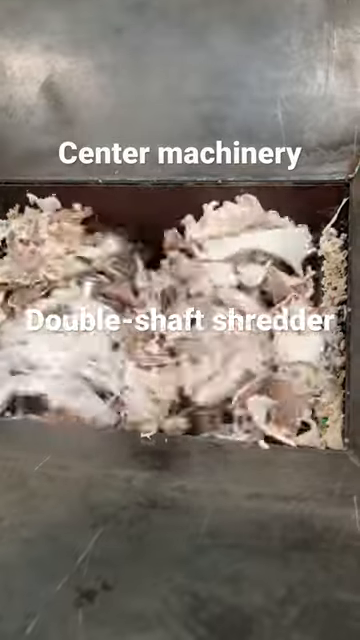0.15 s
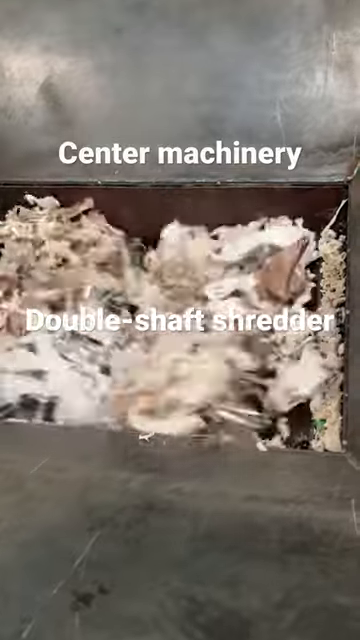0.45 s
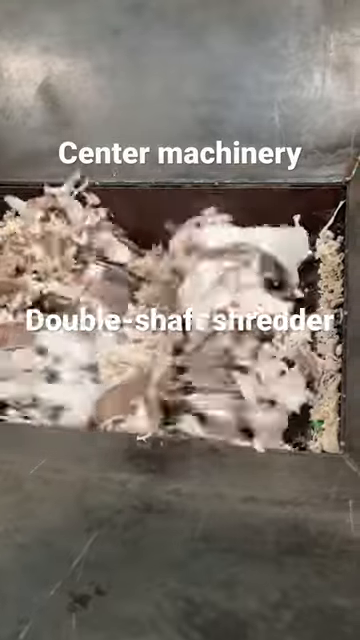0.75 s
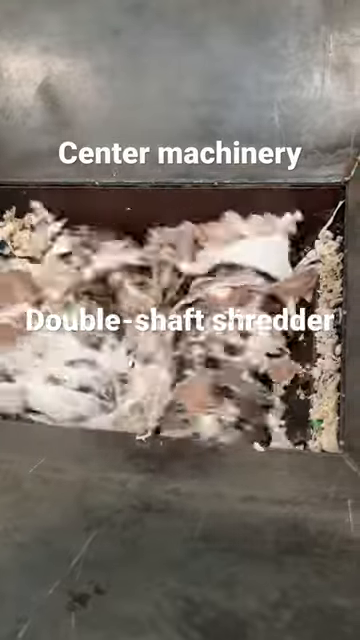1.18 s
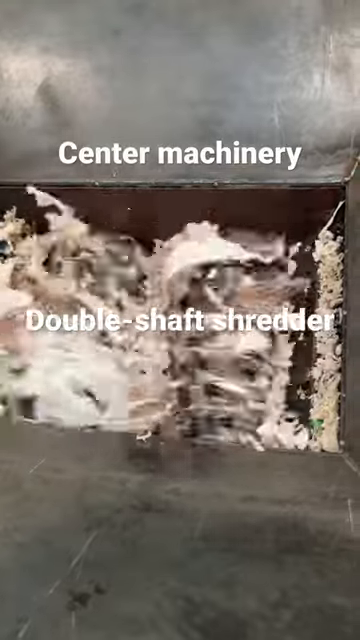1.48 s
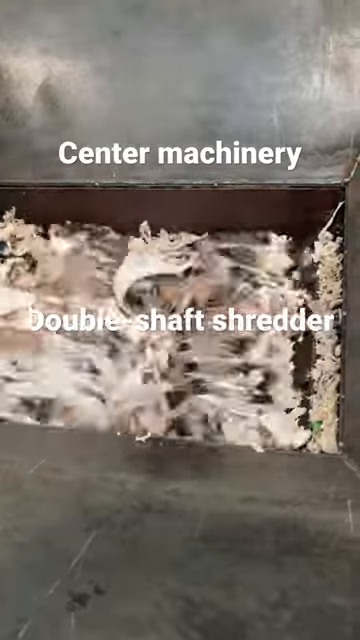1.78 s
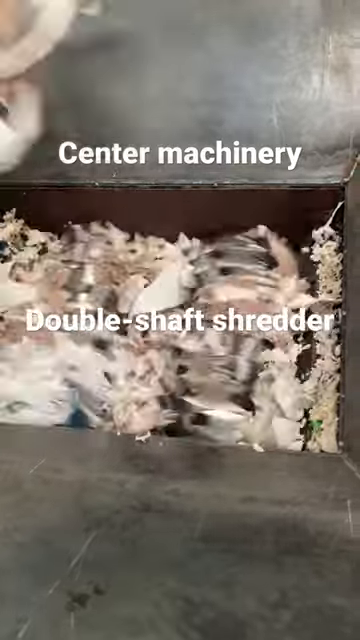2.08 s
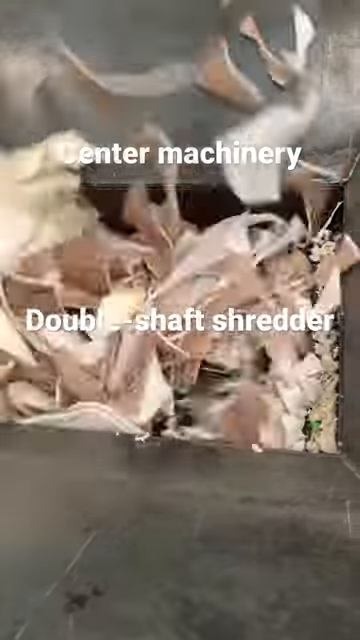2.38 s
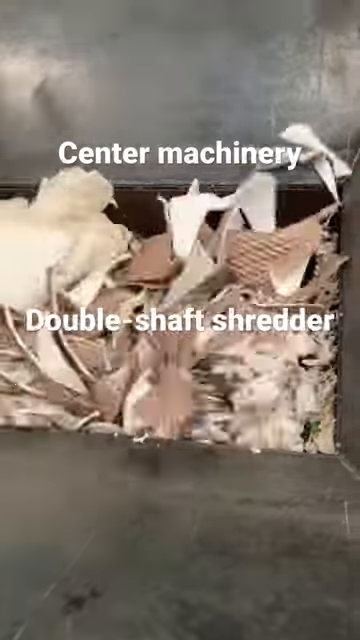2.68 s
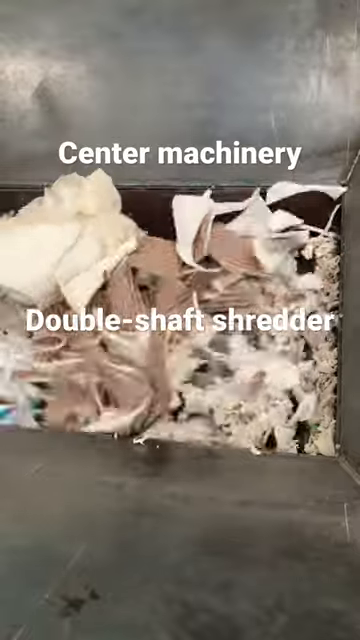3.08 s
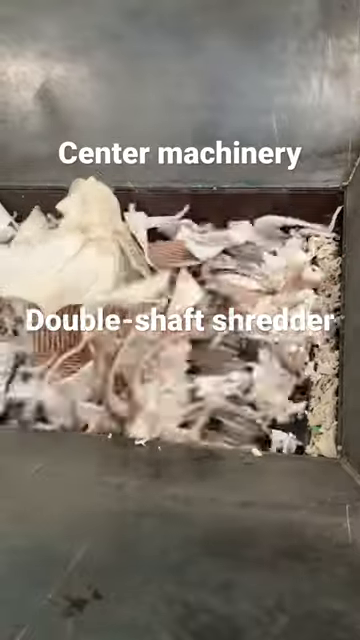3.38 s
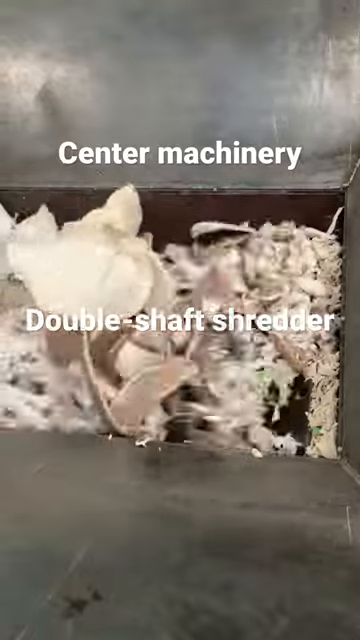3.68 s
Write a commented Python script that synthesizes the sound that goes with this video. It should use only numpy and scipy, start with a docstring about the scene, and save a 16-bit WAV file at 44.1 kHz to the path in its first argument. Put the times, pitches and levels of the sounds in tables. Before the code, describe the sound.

An industrial shredder runs continuously in a ringing steel hopper, heard close from above: low rumble, wavering hum and gear whine under crunching scraps, with thuds and faint squeaks; it eases briefly, then swells on fresh card.

```python
"""A double-shaft shredder chews paper and card in a steel hopper, heard from above through two close ports.
From the start the drive hums and its gears whine, as sums of wavering sine tones; scraps rumble, crunch,
rasp and hiss as coloured noise in the ringing hopper, with short noise bursts, squealing cutter modes and
gliding squeaks. Around 2.5 s the deep drone and the crunch sink as the load lightens; near 2.9 s a fresh
armful of card is seized and the roar swells."""
import sys
import numpy as np
from scipy import signal
from scipy.fft import rfft, irfft
from scipy.io import wavfile
from scipy.ndimage import uniform_filter1d

SR = 44100
rng = np.random.default_rng(int(sys.argv[2]) if len(sys.argv) > 2 else 0)


def wav_out(sig):
    """Save sig, one row per channel (or a flat mono array), as 16-bit PCM at SR to the path in sys.argv[1]."""
    wavfile.write(sys.argv[1], SR, np.round(np.clip(np.atleast_2d(sig).T, -1, 1) * 32767).astype(np.int16))


N = 169785
T, HZ = np.arange(N) / SR, np.fft.rfftfreq(N, 1 / SR)


# load on the cutters, layer levels before trim: time_s, rumble_db, crunch_db, rasp_db
LOAD = [(0, -28, -24.5, -30), (0.2, -23, -27.5, -29), (0.45, -20.5, -25.5, -31.5), (0.7, -24.5, -27, -31.5),
        (0.9, -23.5, -25, -31), (1.08, -25, -27, -30.9), (1.35, -22, -25, -31.5), (1.6, -24, -28, -31),
        (1.85, -21.5, -24, -31.5), (2.1, -22, -25.5, -32), (2.3, -24.5, -26.5, -30.5),
        (2.5, -24.5, -29, -33.5), (2.78, -21, -26, -30.5), (2.92, -18, -21, -30.5),
        (3.1, -20, -23.3, -27.5), (3.3, -19.5, -24.5, -28), (3.52, -21, -23, -29.5), (3.85, -21, -25, -28)]
# layer spectra before the hopper, shape only: freq_hz, density_db_per_hz
RUMBLE_SPECTRUM = [(20, -62.5), (28, -37), (33, -14.5), (46, -11), (62, -4.5), (73, -8.5), (86, -8.5),
                   (100, -1.5), (140, -3.5), (160, -6), (180, -5.5), (205, -3.5), (245, -4), (268, -14),
                   (325, -7.5), (400, -26.5), (700, -70.5)]
CRUNCH_SPECTRUM = [(200, -38), (330, -12), (400, -7.5), (450, -4), (520, -3), (600, -1.5), (720, -2),
                   (800, -2.5), (960, -2), (1100, -25.5), (2000, -68.5)]
RASP_SPECTRUM = [(500, -27), (900, -12), (1100, -0.5), (1350, -4.5), (1650, -8), (1900, -11), (2500, -12),
                 (4000, -39.5), (8000, -58.5)]
HISS_SPECTRUM = [(900, -21), (2000, -3), (2600, -0.5), (3300, -2), (4000, -0.5), (4900, -8.5), (6100, -5.5),
                 (6550, -9), (6800, -8), (7050, -8), (7450, -9), (7800, -29.5), (9500, -19.5), (10500, -42)]


def churn(body, rumble_trim_db=1.5, crunch_trim_db=1, rasp_trim_db=0, hiss_db=-35):
    """Scraps are crushed and torn: four layers of snaps ring the hopper, three of them following the load."""
    rumble_db, crunch_db, rasp_db = curve(LOAD)

    def layer(spectrum, level_db, flicker_db, grain):
        """One snap layer, coloured by its spectrum and the hopper, flickering in level."""
        level = amp(level_db + flicker_db * drift(30))
        colour = body * amp(across(spectrum, HZ)[0])
        return level * ports(grain, colour)

    crushing = snaps(per_s=500, spread_db=0.0, share=0.12)
    crushing = patchy(crushing, patch_db=1.6, patch_hz=220, patch_s=0.062)
    tearing = snaps(per_s=1000, spread_db=0.0, share=0.2)
    tearing = patchy(tearing, patch_db=2.0, patch_hz=218, patch_s=0.063)
    rustling = snaps(per_s=2000, spread_db=1.0, share=0.12)
    rustling = patchy(rustling, patch_db=2.5, patch_hz=150, patch_s=0.032)
    thudding = snaps(per_s=760, spread_db=3.0, share=0.15)

    out = layer(RUMBLE_SPECTRUM, rumble_db + rumble_trim_db, flicker_db=0.07, grain=thudding)
    out += layer(CRUNCH_SPECTRUM, crunch_db + crunch_trim_db, flicker_db=1.32, grain=crushing)
    out += layer(RASP_SPECTRUM, rasp_db + rasp_trim_db, flicker_db=0.26, grain=tearing)
    out += layer(HISS_SPECTRUM, hiss_db, flicker_db=0.77, grain=rustling)
    return out


def snaps(per_s, spread_db, share):
    """Random snaps, sized by an exponential spread in dB, over a smooth wash; share is the snaps' power part."""
    size = amp(spread_db * np.minimum(rng.exponential(1, N), 4))
    size = size * (rng.random(N) < per_s / SR)
    share = np.clip(share, 0, 1)
    sparse = unit(size * rng.standard_normal((2, N)))
    wash = rng.standard_normal((2, N))
    return np.sqrt(share) * sparse + np.sqrt(1 - share) * wash


def patchy(noise, patch_db, patch_hz, patch_s):
    """Each scrap tears at its own pitch: the level varies in patches of time and frequency."""
    window, hop = 1024, 256
    z = signal.stft(noise, nperseg=window, noverlap=window - hop)[2]
    per_hz = np.fft.fftfreq(z.shape[1], SR / window)
    per_s = np.fft.fftfreq(z.shape[2], hop / SR)
    bins, frames = np.meshgrid(per_hz, per_s, indexing="ij")
    smooth = np.exp(-2 * ((bins * patch_hz) ** 2 + (frames * patch_s) ** 2))
    field = unit(np.fft.ifft2(np.fft.fft2(rng.standard_normal(z.shape[1:])) * smooth).real)
    return signal.istft(z * amp(patch_db * field), nperseg=window, noverlap=window - hop)[1][:, :N]


# drive tone levels before trim: time_s, drone_db, hum_db
DRIVE = [(0, -20, -17.5), (0.22, -34, -27), (0.38, -25, -21.5), (0.62, -26, -28), (0.88, -27, -17.5),
         (1.12, -26, -27), (1.26, -31, -19.5), (1.38, -31, -27), (1.53, -28, -18), (1.75, -33, -21),
         (1.95, -36, -28), (2.2, -33, -35), (2.45, -37, -25), (2.6, -50, -25), (2.83, -35.5, -37),
         (3.05, -30, -19.5), (3.45, -32, -23), (3.85, -23, -22.5)]
DRONE_HZ, HUM_HZ = 56.17, 127.5
# growl of the frame under load, level relative to the rumble_db of LOAD
GROWL_HZ, GROWL_REL_DB = 181.1, -6.5
# gear whine levels before trim: time_s, lower_db, upper_db
WHINE = [(0, -38, -31), (0.5, -31.5, -32.5), (0.8, -32.5, -38.5), (1.1, -31.5, -30.5), (1.35, -33, -30),
         (1.6, -39.5, -40.5), (1.8, -32, -40), (2.2, -30.5, -39), (2.7, -31, -36), (2.95, -36, -35.5),
         (3.3, -29, -32), (3.55, -39, -37), (3.85, -44, -27.5)]
# pitches of the two gear whines: lower_hz, upper_hz
WHINE_HZ = (830, 926)
# faint fluttering gear tones of constant mean level: pitch_hz, level_db, flutter_0_to_1
GEARS = [(1264, -56, 1), (1330, -46, 0.94), (1393, -50.5, 0.6), (1520, -48.5, 0.92), (1734, -52.5, 0.1),
         (3340, -59.5, 0)]


def drive(drone_trim_db=1.0, hum_trim_db=0.5, whine_trim_db=0.5):
    """Drive and gears as narrow tones: deep drone, hum, growl under load, whines and faint gear tones."""
    drone_db, hum_db = curve(DRIVE)
    growl_db = curve(LOAD)[0] + GROWL_REL_DB
    out = amp(drone_db + drone_trim_db) * tone(DRONE_HZ, flutter=0.061, flutter_rate=14, wander=0.0033)
    out += amp(hum_db + hum_trim_db) * tone(HUM_HZ, flutter=0.17, flutter_rate=9.4, wander=0.0033)
    out += amp(growl_db) * tone(GROWL_HZ, flutter=0.35, flutter_rate=12, wander=0.0058)
    for pitch_hz, level_db in zip(WHINE_HZ, curve(WHINE)):
        out += amp(level_db + whine_trim_db) * tone(pitch_hz, flutter=0.42, flutter_rate=24, wander=0.0014)
    for pitch_hz, level_db, flutter in GEARS:
        out += amp(level_db) * tone(pitch_hz, flutter, flutter_rate=29.0, wander=0.0012)
    return out


def tone(pitch_hz, flutter, flutter_rate, wander):
    """One line of the drive, wavering in pitch and fluttering as the teeth mesh."""
    turns = np.cumsum(pitch_hz * (1 + wander * drift(2.52))) / SR
    shake = flutter * (drift(flutter_rate) + 1j * drift(flutter_rate)) / np.sqrt(2)
    wave = unit((1 + shake) * np.exp(2j * np.pi * (turns + rng.random())))
    _, lead_rad, tilt_db = across(PORTS, pitch_hz)
    left = wave * amp(tilt_db / 2)
    right = wave * np.exp(-1j * lead_rad) * amp(-tilt_db / 2)
    return np.sqrt(2) * np.array([left, right]).real


BITE_RISE_S = 0.018
# bursts from low thuds to scrapes, plus a faint long gear-like tone near 1.7 kHz: start_s,
# level_db (before envelope), centre_hz, length_s (fall to 1/e, rise aside), width_octaves (standard deviation)
BITES = [(0.075, -14.5, 650, 0.026, .25), (0.082, -21, 104, 0.11, 0.13), (0.097, -46.5, 1693, .45, .01),
         (0.193, -33.5, 2150, 0.073, .2), (0.212, -24, 680, 0.03, .2), (0.308, -26, 1600, 0.029, .18),
         (0.331, -18.5, 730, 0.031, .3), (0.496, -29, 196, 0.09, 0.07), (.545, -32, 1970, .035, 0.33),
         (0.581, -21, 649, 0.03, 0.23), (0.787, -18, 119, 0.063, 0.34), (.80, -30.5, 1550, 0.03, 0.17),
         (0.938, -31, 1600, .06, .15), (1.175, -31, 1320, 0.058, 0.42), (1.208, -24, 198, 0.056, 0.75),
         (1.434, -26.5, 1250, 0.083, 0.5), (1.49, -18.5, 105, 0.14, .12), (1.76, -21, 680, 0.071, 0.22),
         (1.799, -19.5, 200, 0.06, .22), (1.875, -21, 640, 0.049, 0.14), (1.974, -20, 684, 0.034, 0.37),
         (2.012, -23.5, 1070, 0.047, .07), (2.292, -31, 1350, 0.049, .15), (2.738, -29, 4200, 0.025, .35),
         (2.83, -16.5, 673, 0.055, 0.14), (2.84, -22, 443, 0.038, 0.36), (2.857, -13.5, 101, 0.081, 0.062),
         (2.962, -22, 670, 0.05, 0.18), (3.104, -28, 742, 0.21, 0.024), (3.182, -26.5, 110, 0.4, 0.075),
         (3.24, -21.5, 616, 0.11, 0.28), (3.253, -31, 1450, 0.075, 0.22), (3.326, -19, 204, 0.063, 0.047),
         (3.37, -25, 465, 0.037, 0.21), (3.435, -26.5, 1400, .035, 0.18), (3.556, -25, 1530, 0.076, 0.18),
         (3.59, -15, 150, 0.043, 0.4), (3.70, -25, 1410, 0.042, 0.13), (3.787, -20.5, 440, 0.073, 0.067)]


def bites(body):
    """Bursts of band noise that rise fast and die away: thuds, scrapes and one faint long gear-like tone."""
    out = np.zeros((2, N))
    noise = rfft(ports(rng.standard_normal((2, N)), body))
    for start_s, level_db, centre_hz, length_s, width_octaves in BITES:
        age_s = np.maximum(T - start_s, 0)
        shape = np.minimum(age_s / BITE_RISE_S, 1) * np.exp(-(age_s / length_s) ** 2)
        band = np.exp(-0.5 * (np.log2((HZ + 1) / centre_hz) / width_octaves) ** 2)
        out += amp(level_db) * shape * unit(irfft(noise * band, N))
    return out


# rubbing levels of the two squeal groups before flicker: time_s, first_db, second_db
RUB = [(0, -54, -58), (.18, -36, -41), (.35, -51, -54), (.55, -48, -45), (.76, -38, -42), (.85, -38, -38.5),
       (1.15, -36, -46), (1.38, -44.5, -46), (1.5, -39.5, -42), (1.75, -46, -40.5), (2.0, -36.5, -44),
       (2.3, -43.5, -42.5), (2.55, -44, -43.5), (2.8, -46, -45), (3.05, -41, -41), (3.3, -43, -39),
       (3.48, -48, -47), (3.65, -49, -44.5), (3.85, -50, -46)]
# cutter modes, levels relative within a group: freq_hz, width_hz, level_db
# first squeal group near 5.4-5.9 kHz, second near 5.0-5.5 kHz plus 6.7 kHz
FIRST_MODES = [(5430, 180, -12), (5554, 91, -2), (5720, 65, 0.5), (5900, 90, -9.5)]
SECOND_MODES = [(5020, 96, -5.5), (5240, 96, 3), (5450, 130, -4.5), (6670, 140, -8.5)]


def squeal(flicker_db=2.55, wander_hz=16):
    """Friction excites two groups of high cutter modes, which waver as the contact moves."""
    out, hz_axis = np.zeros((2, N)), np.fft.fftfreq(N, 1 / SR)
    for modes, level_db in zip((FIRST_MODES, SECOND_MODES), curve(RUB)):
        gain = sum(amp(mode_db) / (1 + (2 * (hz_axis - freq_hz) / width_hz) ** 2)
                   for freq_hz, width_hz, mode_db in modes)
        ring = np.fft.ifft(gain * np.fft.fft(rng.standard_normal((2, N))))
        ring = ring * np.exp(2j * np.pi * np.cumsum(wander_hz * drift(7.2)) / SR)
        out += amp(level_db + flicker_db * drift(17)) * ports(ring.real, 1)
    return out


SQUEAKS_PER_S, SQUEAK_MEAN_S = 20, 0.1
SQUEAK_LOW_HZ, SQUEAK_HIGH_HZ = 1292, 4106
SQUEAK_MAX_GLIDE = 0.015  # fraction of pitch, up or down
# mid level at SQUEAK_HIGH_HZ, spread either way, slope with pitch
SQUEAK_TOP_DB, SQUEAK_SPREAD_DB, SQUEAK_DB_PER_OCTAVE = -47, 5.5, -6.5


def squeaks(jitter=0.012):
    """Scraps of card slip over the steel with short, rough, gliding squeaks at random times."""
    out, shake = np.zeros((2, N)), 1 + jitter * drift(120)
    count = int(SQUEAKS_PER_S * N / SR)
    for when, pitch, size, length, glide, side in rng.random((count, 6)):
        first = int(when * N)
        samples = SQUEAK_MEAN_S * (0.5 + length) * SR
        at = np.arange(first, min(N, int(when * N + samples)))
        progress = (at - first) / samples
        pitch_hz = SQUEAK_LOW_HZ * (SQUEAK_HIGH_HZ / SQUEAK_LOW_HZ) ** pitch
        bend = 1 + SQUEAK_MAX_GLIDE * (2 * glide - 1) * progress
        phase_rad = 2 * np.pi * np.cumsum(pitch_hz * bend * shake[at]) / SR
        level_db = SQUEAK_TOP_DB + SQUEAK_SPREAD_DB * (2 * size - 1)
        level_db += SQUEAK_DB_PER_OCTAVE * np.log2(pitch_hz / SQUEAK_HIGH_HZ)
        lead_rad = across(PORTS, pitch_hz)[1] + 2 * (side - 0.5)
        out[:, at] += amp(level_db) * np.sin(np.pi * progress) * np.sin([phase_rad, phase_rad - lead_rad])
    return out


# hopper resonances: freq_hz, width_hz, lift_db
HOPPER = [(98, 8, 5), (108.2, 8.7, 4.5), (196.3, 6.1, 2.5), (210, 5.1, 5.5), (234.5, 13, 1.5),
          (279, 6.6, 8.5), (295.7, 7.2, 6), (377.5, 14, 7.5), (438.5, 24, 7.5), (475, 17.7, 6),
          (565, 16, 8), (612, 8.2, 9), (690, 30, 3.5), (731.5, 15, 4.5), (980, 28, 4), (2630, 74, 2.5),
          (3030, 120, 3.5), (3340, 130, 4.5)]


def hopper(ripple_db=2.0, ripple_hz=14):
    """Gain of the steel hopper: its main resonances and, above 500 Hz, a ripple of many small ones."""
    lift = sum(lift_db / (1 + (2 * (HZ - freq_hz) / width_hz) ** 2) for freq_hz, width_hz, lift_db in HOPPER)
    ripple = unit(uniform_filter1d(rng.standard_normal(len(HZ)), max(2, int(ripple_hz * N / SR))))
    return amp(lift + ripple_db * ripple * np.clip(HZ / 1000 - 0.5, 0, 1))


# microphone ports: freq_hz, likeness_0_to_1, left_lead_rad, left_minus_right_db
PORTS = [(30, 0.85, 1.5, 8.5), (56.3, .998, 2, 3.5), (78.5, 0.94, 2.5, 11), (97.8, 0.99, 1.5, 0),
         (128, 1, 2.0, -1), (199, 1, 1.64, -1.1), (340, 0.97, 0.03, -.3), (463, 0.88, -1.56, 0),
         (611, 0.75, -2.5, 0), (651, 0.78, -1.2, -1.5), (766, 0.84, 0.3, 0), (830, 1, -1.58, -0.5),
         (958, 0.5, -1.4, -0.2), (900, 0.5, -0.46, -1), (1250, 0.87, -0.9, -0.5), (1740, 0.61, -0.55, 0.5),
         (2460, 0.1, -2, -0.5), (3620, 0.45, -2, -0.5), (4440, 0.06, -6.5, 0.5), (5200, 0.65, -3.5, -1),
         (5780, 0.74, -2.5, -0.5), (6130, 0.6, -1.5, 0.5), (7230, 0.88, -3, 1.5)]


def ports(noise, gain):
    """Colours two unrelated signals and blends them into what the two ports hear, at rms 1."""
    same, lead_rad, tilt_db = across(PORTS, HZ)
    same = np.clip(same, 0, 1)
    left, other = rfft(noise)
    right = (same * left + np.sqrt(1 - same ** 2) * other) * np.exp(-1j * lead_rad)
    return unit(irfft(np.array([left * amp(tilt_db / 2), right * amp(-tilt_db / 2)]) * gain, N))


def drift(rate):
    """Slow random signal of rms 1, up to about rate changes a second."""
    lowpass = (HZ > 0) / (1 + (HZ / rate) ** 4)
    return unit(irfft(rfft(rng.standard_normal(N)) * lowpass, N))


def curve(table):
    """The columns of a time table at every sample."""
    time_s, *columns = np.transpose(table)
    return [np.interp(T, time_s, c) for c in columns]


def across(table, hz):
    """The columns of a frequency table at hz, interpolated over log frequency."""
    freq_hz, *columns = np.transpose(table)
    return [np.interp(np.log(hz + 1), np.log(freq_hz + 1), c) for c in columns]


def amp(db):
    """Decibels to gain."""
    return 10 ** (np.asarray(db) / 20)


def unit(x):
    """Scales to rms 1."""
    return x / np.sqrt(np.mean(abs(x) ** 2) + 1e-20)


def scene():
    """The whole machine."""
    body = hopper()
    return churn(body) + drive() + bites(body) + squeal() + squeaks()


EDGE_HZ = 10100


def record(dry):
    """The recorder's band limit: a steep low-pass."""
    lowpass = signal.firwin(511, EDGE_HZ, window=("kaiser", 9), fs=SR)
    return signal.oaconvolve(dry, lowpass[None], "same")


dry = scene()
out = record(dry)
wav_out(out)
```